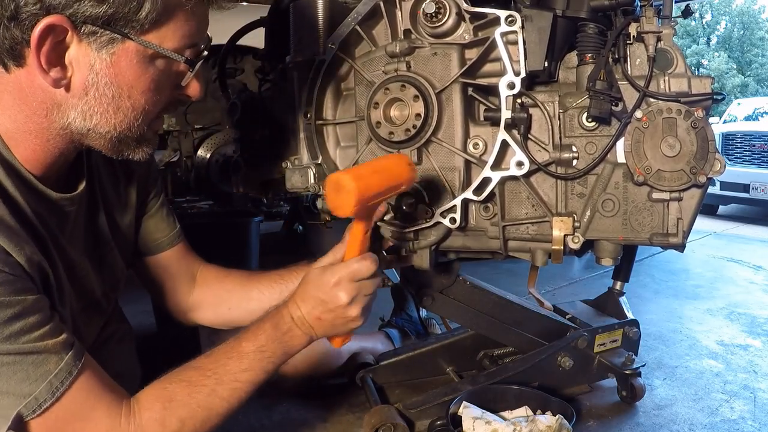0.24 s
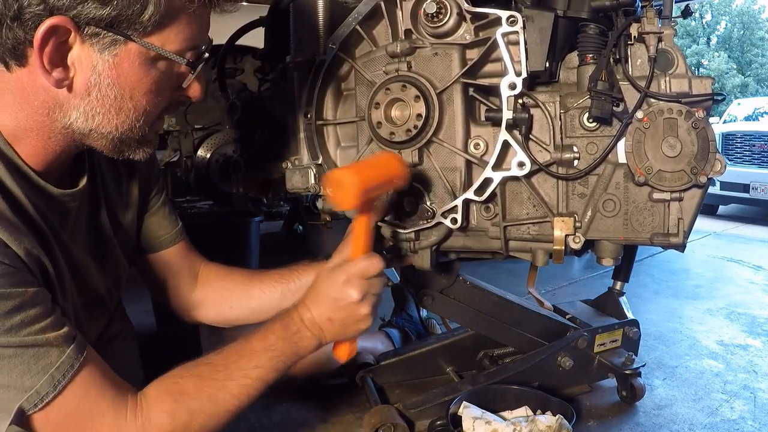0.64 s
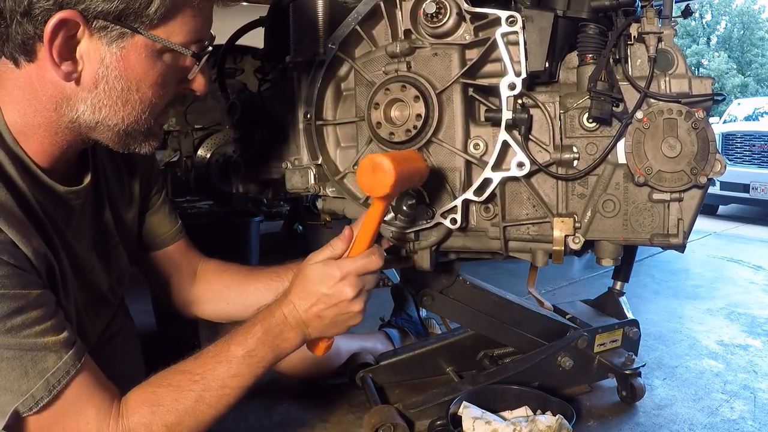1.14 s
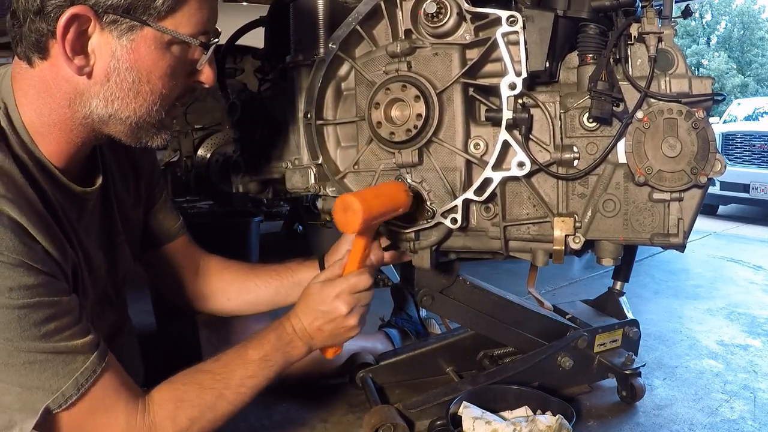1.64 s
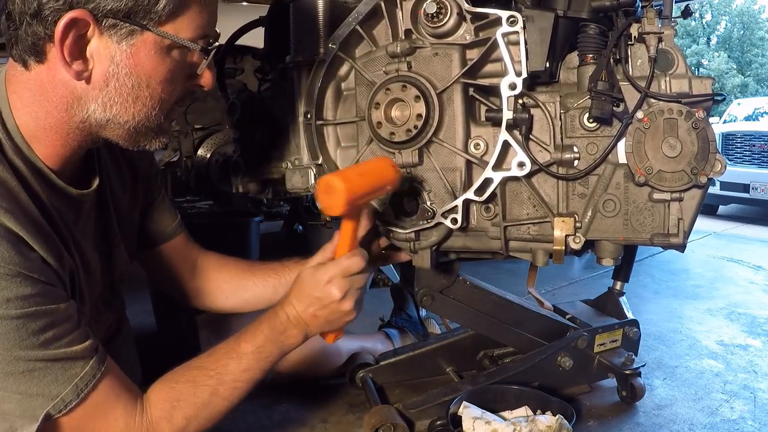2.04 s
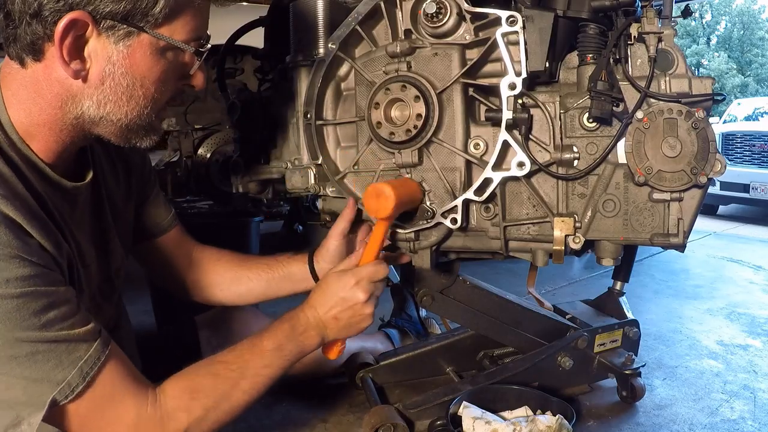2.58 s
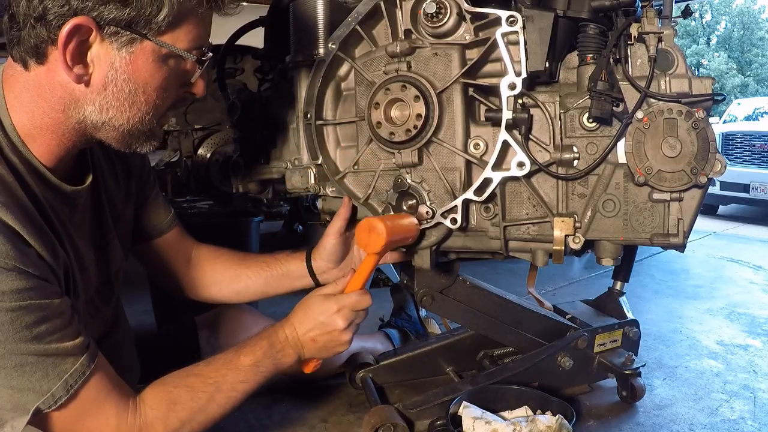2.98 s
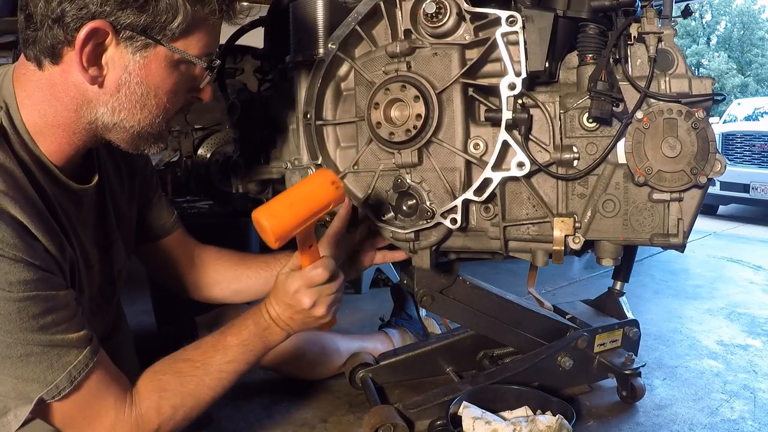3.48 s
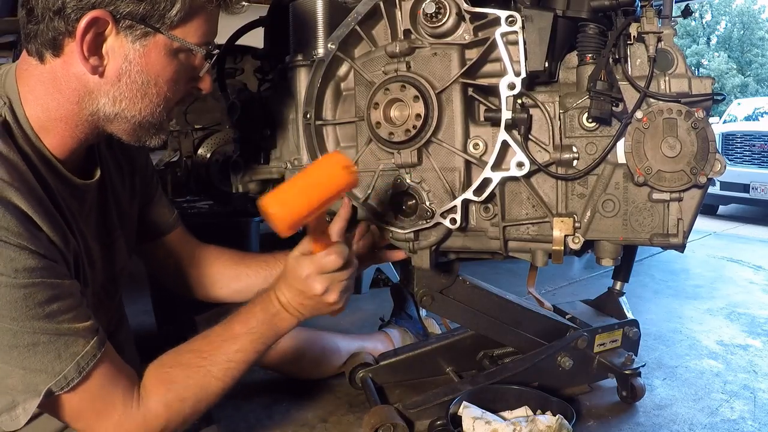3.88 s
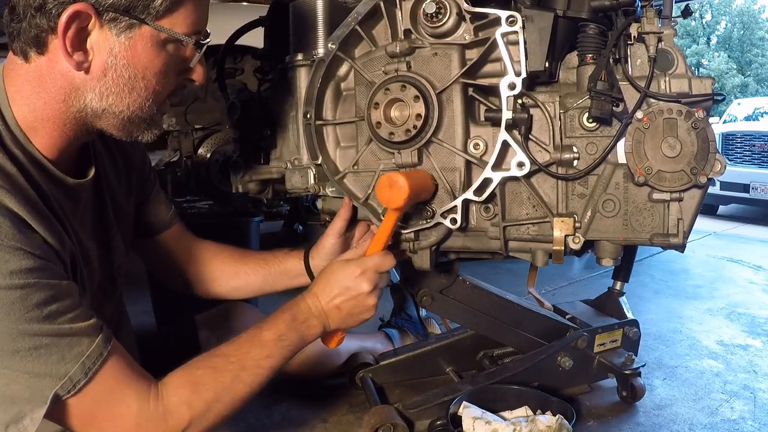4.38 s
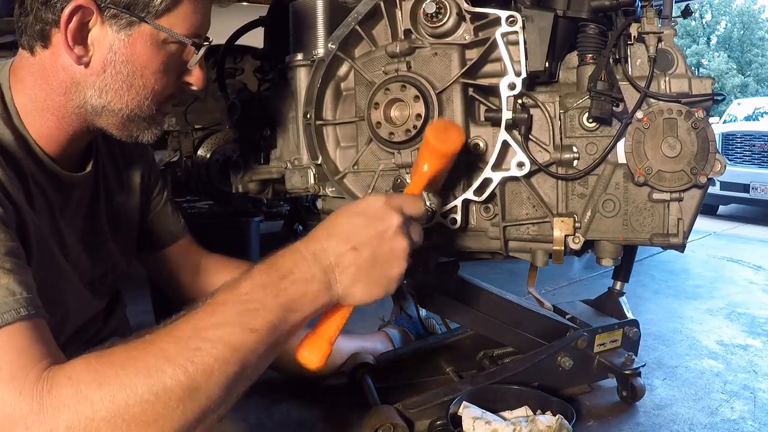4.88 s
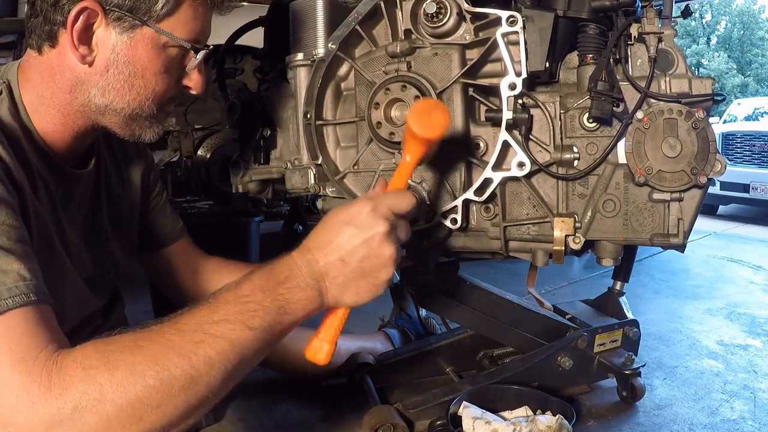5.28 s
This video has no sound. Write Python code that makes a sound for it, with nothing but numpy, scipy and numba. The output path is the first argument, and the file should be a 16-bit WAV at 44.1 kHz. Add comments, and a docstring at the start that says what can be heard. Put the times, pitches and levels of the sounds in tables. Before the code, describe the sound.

Steady sharp mallet knocks on a metal engine case, loose shot swishing between them, with a short garage echo and faint outdoor rumble.

```python
"""Mallet taps on a metal cover

A dead-blow mallet taps a cast metal cover home in front of a stereo camera in an open garage.
Each blow is a sum of short fading tones with a sharp snap; noise clicks make the loose steel shot
swish on the swing and slam after the blow. Loose parts clatter and case panels hum on in noise bands.
The garage answers with a short noise tail, over outdoor rumble and hiss; the camera holds the peaks down.
"""
import sys
import numpy as np
from scipy import signal
from scipy.fft import rfft, irfft, next_fast_len
from scipy.io import wavfile
from scipy.ndimage import uniform_filter1d
from numba import njit

SR = 44100
rng = np.random.default_rng(int(sys.argv[2]) if len(sys.argv) > 2 else 0)


def to_wav(s):
    """Save 16-bit WAV."""
    ch = np.atleast_2d(s).T  # columns
    pcm = np.round(np.clip(ch, -1, 1) * 32767)  # PCM
    wavfile.write(sys.argv[1], SR, pcm.astype(np.int16))


N = 243758
FAST = next_fast_len(N)  # padded length for quick transforms
SQUASH_S = 0.0008  # the soft face gives before the casting speaks

# The mallet blows; levels are relative. Three regions of pitch are favoured by the struck spot.
# Columns: start_s, blow_db, thud_db (of the head), low_hz, low_lift_db, high_hz, high_lift_db,
# bright_db (of the echo), slam_db (of the shot), bass_hz, bass_lift_db, snap_db, clatter_db
BLOWS = [(0.0307, -10, -34, 748, 6, 3300, 2, 0, -27, 520, 5, -12, -60),
         (0.3489, -9.5, -34, 759, 5, 6400, 6, 1, -26.5, 527, 6, -13, -54),
         (0.689, -17, -36, 2000, 2, 6700, 3, 1, -24.5, 199, 5, -22, -54),
         (1.488, -14, -31, 2380, 6, 5900, 6, 0, -26, 320, 2, -11, -56),
         (1.8229, -7.5, -36, 764, 4, 1695, 5, 1, -29.5, 190, 5, -5, -42),
         (2.2049, -7.5, -34, 1765, 6, 3280, 6, -1, -28, 400, 5, -11, -41),
         (2.5295, -7, -34, 1170, 3, 3150, 9, 3, -26.5, 430, 3, -5, -38),
         (2.9033, -11.5, -33, 974, 10, 2430, 4, -1, -27, 452, 1, -7, -50),
         (3.2251, -8, -36, 737, 2, 2240, 5, 4, -29, 300, 1, -6, -39),
         (3.573, -7, -36, 1550, 2, 2340, 7, 1, -27.5, 511, 3, -6, -40),
         (3.9516, -7, -34, 1000, 8, 3590, 3, 3, -25.5, 400, 7, -3, -39),
         (4.3086, -8.5, -32, 850, 3, 3270, 4, 0, -24.5, 400, 7, -9, -43),
         (5.0777, -27, -37, 4740, 4, 5900, 10, 0, -27, 247, 2, -23, -60),
         (5.4243, -11, -31, 904, 8, 3500, 4, -2, -26, 300, 3, -15, -56)]


def undb(db):
    """Turn decibels into a plain factor on the sound wave."""
    return 10 ** (np.asarray(db) / 20)


def along(table, hz):
    """Table value at hz, straight on a log-frequency axis."""
    points = np.array(table)
    return np.interp(np.log(np.maximum(hz, 1)), np.log(points[:, 0]), points[:, 1])


def colour(x, table):
    """Shape the spectrum; unit noise keeps rms 1."""
    gain = undb(along(table, np.fft.rfftfreq(FAST, 1 / SR)))
    gain = gain / np.sqrt(np.mean(gain ** 2))
    return irfft(rfft(x, FAST) * gain, FAST)[..., :N]


def spread(mid, side, focus):
    """Left and right from two unrelated sounds; focus 0 = diffuse, 1 = one point."""
    # Diffuse sound, how alike left and right are. Columns: pitch_hz, likeness (-1..1)
    likeness = [(60, 0.6), (130, 0.094), (290, 0.76), (640, -0.18), (1410, -0.29), (3100, 0.81),
                (6820, -0.06), (15000, -0.4)]
    size = next_fast_len(len(mid))
    alike = along(likeness, np.fft.rfftfreq(size, 1 / SR)) * (1 - focus) + focus
    alike = np.clip(alike, -1, 1)
    shared = rfft(mid, size) * np.sqrt((1 + alike) / 2)
    opposed = rfft(side, size) * np.sqrt((1 - alike) / 2)
    return irfft(np.array([shared + opposed, shared - opposed]), size)[:, :len(mid)]


def walk(rate):
    """Random levels held 1 / rate s and smoothed twice."""
    hold = int(SR / rate)
    steps = np.repeat(rng.standard_normal(N // hold + 1), hold)
    return uniform_filter1d(uniform_filter1d(steps, hold), hold)[:N]


@njit
def follow(x, attack, release):
    """Envelope that rises and sinks at two separate speeds (share of the gap closed per sample)."""
    level, out = 0., np.empty(len(x))
    for i in range(len(x)):
        level += (x[i] - level) * (attack if x[i] > level else release)
        out[i] = level
    return out


def lift_db(row, hz, width_octaves=0.3):
    """The struck spot favours three regions of pitch, each a smooth hump."""
    total = 0
    for centre_hz, hump_db in (row[9:11], row[3:5], row[5:7]):
        octaves = np.log2(np.maximum(hz, 1) / centre_hz)
        total = total + hump_db * np.exp(-(octaves / width_octaves) ** 2 / 2)
    return total


def blows(scatter_db=1.65, lag_rad=1.29, crack_s=0.00153):
    """Each blow rings fading tones, out of step at the two ports, and sends the walls a pitchless crack.

    Rows 0 and 1 are left and right; row 2 is what the walls hear from all faces of the casting at once.
    """
    # Mallet face and rim of the cover. Columns: pitch_hz, level_db (against the blow), t60_s
    face_modes = [(4000, -13, .008), (4520, -15, 0.013), (5250, -23, 0.013), (6210, -15, 0.014),
                  (6960, -10.5, 0.0063), (9700, -19, 0.006), (12100, -36, 0.0039), (14000, -34, 0.0057)]
    # Cover and case. Columns: pitch_hz, t60_s
    body_modes = [(200, .019), (330, .026), (510, .035), (640, .03), (765, .03), (860, .025), (960, .025),
                  (1130, .022), (1330, .015), (1560, .0115), (1760, .0115), (2010, .01), (2290, .009),
                  (2700, .0085), (3150, .0085), (3550, .0085)]
    # How strongly each blow wakes the body modes: one row per blow, one column of level_db per mode
    body_wake = [(-20, -30, -21, -34, -20, -23, -22, -22, -21, -19, -17, -16, -21, -30, -17, -20),
                 (-19, -35, -19, -37, -18, -20, -22, -22, -22, -15, -21, -21, -17, -18, -16, -15),
                 (-23, -29, -31, -32, -35, -31, -32, -41, -31, -24, -26, -21, -24, -30, -25, -25),
                 (-20, -22, -36, -31, -24, -27, -26, -31, -35, -26, -21, -16, -14, -25, -33, -17),
                 (-21, -42, -24, -36, -17, -19, -20, -20, -17, -15, -10, -12, -12, -21, -20, -16),
                 (-22, -23, -25, -28, -31, -23, -27, -17, -31, -21, -10, -17, -11, -18, -12, -11),
                 (-23, -23, -27, -28, -35, -20, -20, -14, -15, -19, -12, -13, -10, -10, -6, -8),
                 (-21, -27, -26, -25, -28, -22, -15, -16, -19, -28, -29, -16, -13, -18, -18, -17),
                 (-24, -26, -25, -25, -22, -24, -25, -19, -26, -18, -12, -11, -7, -17, -9, -12),
                 (-22, -29, -23, -23, -23, -22, -24, -21, -35, -13, -10, -8, -6, -19, -11, -10),
                 (-20, -20, -21, -26, -25, -16, -17, -11, -13, -20, -18, -20, -17, -15, -17, -12),
                 (-20, -20, -22, -22, -25, -20, -21, -19, -29, -20, -19, -15, -14, -24, -12, -13),
                 (-26, -31, -44, -43, -36, -39, -41, -36, -44, -31, -43, -33, -27, -42, -41, -27),
                 (-21, -22, -23, -35, -21, -21, -19, -20, -18, -21, -21, -18, -17, -17, -14, -14)]
    # How alike the two ports hear a blow. Columns: pitch_hz, likeness (-1..1)
    blow_likeness = [(60, 0.59), (130, 0.98), (290, 0.94), (640, 0.25), (1410, 0.54), (3100, 0.76),
                     (6820, 0.23), (15000, 0.44)]
    # Where the echo's brightness acts. Columns: pitch_hz, share (0..1)
    bright_zone = [(900, 0), (2600, 1), (6000, 1), (11000, 0)]
    # Share of the blow sent to the walls: level_db in each zone, and the zone centres (pitch_hz)
    wall_share_db, zone_hz = [-5.5, -14, -10.5, -17], [350, 1050, 2700, 6500]
    # Share of the shot slam sent to the walls. Columns: pitch_hz, level_db
    wall_slam = [(3000, -20), (6500, 5)]
    wall_thud = 0.5  # how far the echo's bass follows the thud rather than the blow
    wall_lift = 0.6  # how much of the spot's lift the walls hear
    detune = 0.012  # random share by which each mode's pitch varies from blow to blow
    build_s, build_cycles = 0.0004, 0.2  # a mode speaks after a moment; the low ones come later

    length = 8192
    out, t = np.zeros((3, N + length)), np.arange(length) / SR
    bins = np.fft.rfftfreq(length, 1 / SR)
    face_hz, face_db, face_t60 = np.transpose(face_modes)
    body_hz, body_t60 = np.transpose(body_modes)
    hz = np.r_[body_hz, face_hz][:, None]
    t60 = np.r_[body_t60, face_t60][:, None]
    build = 1 - np.exp(-t / (build_s + build_cycles / hz))
    # the less alike a band is at the two ports, the more its modes are out of step
    apart = lag_rad * np.sqrt(1 - np.clip(along(blow_likeness, hz), -1, 1))
    chance = rng.standard_normal((len(BLOWS), 4, len(hz), 1))

    bursts = rng.standard_normal((len(BLOWS), length)) * np.exp(-t / crack_s)
    cracks = rfft(np.roll(bursts, 400, axis=1))  # 400 samples (about 9 ms) late: some 3 m more path to a wall and back
    cracks = cracks / np.abs(cracks)  # keep the timing only; the level comes below

    for row, wake_db, (tune, size, phase, turn), crack in zip(BLOWS, body_wake, chance, cracks):
        blow_db, thud_db, bright_db, slam_db = row[1], row[2], row[7], row[8]
        first = int((row[0] + SQUASH_S) * SR)
        span = slice(first, first + length)

        rim_db = blow_db + face_db + lift_db(row, face_hz) + scatter_db * size[len(body_modes):, 0]
        mode_db = np.r_[wake_db, rim_db][:, None]
        fade = undb(mode_db - 60 * t / t60) * build
        start = np.pi + np.clip(hz / 1800, 0, 1) * phase  # the bass starts with a pull
        start[0] = 0  # the lowest mode swings the other way
        for ear in range(2):
            turns = 2 * np.pi * hz * (1 + detune * tune) * t + start + (ear - .5) * apart * turn
            out[ear, span] += np.sum(fade * np.sin(turns), axis=0)

        bass_db = wall_share_db[0] + wall_thud * (thud_db - blow_db)
        walls = list(zip(zone_hz, [bass_db, *wall_share_db[1:]]))
        casting_db = blow_db + bright_db * along(bright_zone, bins) + along(walls, bins)
        casting = undb(casting_db + wall_lift * lift_db(row, bins))
        slam = undb(slam_db + along(wall_slam, bins))
        out[2, span] += irfft(crack * np.hypot(casting, slam))
    return out[:, :N]


def snap(width_s=0.00007, give_s=0.0006, give_db=-14):
    """The face slaps the metal: a slow push of air, then one sharp pull."""
    out, t = np.zeros(N + 512), np.arange(512) / SR
    push = undb(give_db) * np.exp(-((t - SQUASH_S) / give_s) ** 2)
    pull = np.exp(-((t - SQUASH_S - 2 * width_s) / width_s) ** 2)
    for row in BLOWS:
        first, snap_db = int(row[0] * SR), row[11]
        out[first:first + 512] += undb(snap_db) * (push - pull)
    return out[:N]


def pellets(size, table, focus, grain_db):
    """Dense clicks of uneven size, coloured by the table and following the loudness in size."""
    uneven = undb(grain_db * np.minimum(rng.exponential(size=(2, N)), 6))
    clicks = rng.standard_normal((2, N)) * uneven
    return spread(*colour(clicks / np.std(clicks) * size, table), focus)


def shot(roll_sizzle_db=-23, slam_sizzle_db=-17):
    """The shot rolls on each swing, then flies on and piles on the face some ms after the blow."""
    # Shot rolling in the head. Columns: peak_s, level_db, swell_s, fall_s,
    # ring_hz (of the hollow head), ring_db
    swings = [(0.004, -42, .05, .02, 5800, -8), (0.309, -34, .055, .007, 5900, -6),
              (0.649, -32.5, .06, .007, 3800, -6), (0.991, -39, .04, .012, 5400, 0),
              (1.175, -47.5, .06, .04, 6500, -6), (1.379, -43, .06, .015, 5000, -7),
              (1.772, -34.5, .058, .012, 5300, -7), (2.16, -32.5, .066, .007, 6200, -6),
              (2.48, -34, .062, .008, 6000, -7), (2.816, -39, .045, .02, 5300, -5),
              (3.179, -34.5, .05, .011, 5100, -6), (3.529, -32.5, .062, .006, 3700, -7),
              (3.904, -32, .078, .007, 5900, -7), (4.228, -40, .005, .015, 5000, -8),
              (4.261, -30.5, .045, .01, 5000, -8), (4.825, -51, .06, .05, 5900, -5),
              (5.04, -37.5, .04, .013, 6800, -6), (5.381, -35, .034, .011, 6400, -5)]
    # Tone of the rolling shot. Columns: pitch_hz, level_db (per Hz)
    roll_tone = [(1000, -34), (1700, -12), (2400, -5.5), (3600, -4), (5600, 0), (7200, -3), (8400, -16),
                 (9700, -12), (10800, -21), (13800, -22), (15200, -32)]
    # Tone of the shot piling on the face. Columns: pitch_hz, level_db (per Hz)
    slam_tone = [(900, -26), (1500, -13), (2500, -6), (3600, -6), (4600, -7), (5900, 0), (7200, -4),
                 (8500, -14), (12000, -26)]
    # Tone of pellet on pellet. Columns: pitch_hz, level_db (per Hz)
    sizzle_tone = [(7000, -30), (9500, -2), (12000, 2), (14800, 0), (15500, -18)]
    swell_power = 1.4  # bend of the swell
    settle_db, settle_s = -13, 0.04  # stray pellets that roll on
    roll_level_db = -2.2  # overall level of the rolling shot
    hollow_hz = 500  # width of the ring of the hollow head
    late_base_s, late_s_per_db = 0.004, 0.0002  # the softer the blow, the later the shot lands
    landing_spread = 0.7  # width of the landing as a share of its delay

    t = np.arange(N) / SR
    stir, slam, sizzle, hollow = 0, 0, 0, 0
    clumps = undb(2.0 * walk(250))  # the shot moves in clumps
    noise = rng.standard_normal(N)
    stray = undb(settle_db)
    for peak_s, level_db, swell_s, fall_s, ring_hz, ring_db in swings:
        since = np.maximum(t - peak_s, 0)
        swell = np.clip(1 + (t - peak_s) / swell_s, 0, 1) ** swell_power
        fall = (1 - stray) * np.exp(-since / fall_s) + stray * np.exp(-since / settle_s)
        roll = clumps * undb(level_db + roll_level_db) * swell * fall
        stir = stir + roll
        ring = signal.lfilter(*signal.iirpeak(ring_hz, ring_hz / hollow_hz, fs=SR), noise * roll)
        # the root makes up for the level lost in the narrow band
        hollow = hollow + undb(ring_db) * ring * np.sqrt(SR / np.pi / hollow_hz)

    for row in BLOWS:
        start_s, blow_db, slam_db = row[0], row[1], row[8]
        late_s = late_base_s - late_s_per_db * blow_db
        after = (t - start_s - late_s) / (landing_spread * late_s)
        stretch = np.where(after > 0, 1.8, 1)  # it thins out more slowly than it gathers
        arrive = np.exp(-(after / stretch) ** 2 / 2) * (t > start_s + SQUASH_S)
        slam = slam + undb(slam_db) * arrive
        # the sizzle is the densest moment
        sizzle = sizzle + undb(slam_db + slam_sizzle_db) * arrive ** 2
    sizzle = sizzle + undb(roll_sizzle_db) * stir

    rolling = pellets(stir, roll_tone, 0.41, 2.8)
    slamming = pellets(slam, slam_tone, 0.7, 1.64)
    sizzling = pellets(sizzle, sizzle_tone, 0.5, 3.2)
    return hollow + rolling + slamming + sizzling


def clatter(densest_s=0.08):
    """Loose parts on the engine case shake on for a moment after a blow, as a burst of dense clicks."""
    # Tone of the loose parts. Columns: pitch_hz, level_db (per Hz)
    clatter_tone = [(200, -20), (380, 0), (600, -2), (800, -1), (1050, 1), (1350, -13), (1700, -8),
                    (2000, -9), (2800, -5), (3500, -11), (4400, -8), (6300, -8), (8000, -34)]
    t, shake = np.arange(N) / SR, 0
    for row in BLOWS:
        start_s, clatter_db = row[0], row[12]
        since = np.maximum(t - start_s, 0) / densest_s
        shake = shake + undb(clatter_db) * since ** 2 * np.exp(1 - since ** 2)
    uneven = undb(2.5 * walk(60.0))
    return pellets(shake * uneven, clatter_tone, 0.3, 3.5)


def panels(focus=0.3, build_s=0.015):
    """Each panel of the case, shaken unevenly, hums in its own narrow band and dies away."""
    # Panels that buzz on after a blow. Columns: pitch_hz, width_hz, t60_s
    panel_bands = [(368, 40, .5), (805, 40, .5), (1030, 70, .45), (1555, 50, .4), (1770, 60, .4)]
    # How strongly each blow sets them buzzing: one row per blow, one column of level_db per panel
    panel_buzz = [(-47, -48, -54, -53, -56), (-49, -46, -48, -51, -52), (-44, -56, -54, -58, -54),
                  (-43, -55, -54, -60, -60), (-48, -36, -42, -48, -47), (-37, -47, -38, -50, -39),
                  (-36, -46, -35, -49, -41), (-44, -43, -42, -55, -58), (-47, -33, -50, -38, -47),
                  (-37, -33, -46, -49, -47), (-34, -42, -32, -47, -41), (-33, -49, -35, -51, -42),
                  (-50, -58, -58, -60, -60), (-48, -44, -45, -55, -54)]
    kicks, out = np.zeros((len(panel_bands), N)), 0
    starts = (np.array([row[0] for row in BLOWS]) * SR).astype(int)
    kicks[:, starts] = undb(np.transpose(panel_buzz))
    for (hz, width_hz, t60), kick in zip(panel_bands, kicks):
        keep_slow = undb(-60 / t60 / SR)  # share of the level left after one sample
        keep_fast = keep_slow * np.exp(-1 / build_s / SR)
        # slow fade minus quick fade: builds up, then dies away
        shake = signal.lfilter([1], [1, -keep_slow], kick) - signal.lfilter([1], [1, -keep_fast], kick)
        noise = rng.standard_normal((2, N))
        hum = signal.lfilter(*signal.iirpeak(hz, hz / width_hz, fs=SR), noise)
        out = out + hum * shake * np.sqrt(SR / np.pi / width_hz)
    return spread(*out, focus)


def garage(x, first_s=0.0027, fill_s=0.013, wet_db=-22):
    """Diffuse echoes that fill up after the first walls and die band by band."""
    # Echo bands. Columns: pitch_hz, t60_s, level_db
    echo_bands = [(165, 0.26, 15.5), (255, .3, 10), (365, 0.37, 14.5), (706, 0.35, 9.5), (1020, 0.53, 5.5),
                  (1670, 0.44, -0.5), (2910, 0.41, -4.5), (4300, 0.34, -9), (6400, 0.38, -4),
                  (8800, 0.17, -13.5), (13000, 0.22, -32)]
    t = np.arange(SR // 2) / SR
    tail = 0
    for hz, t60, level_db in echo_bands:
        band = signal.butter(2, [hz / 1.3, hz * 1.3], "band", fs=SR, output="sos")
        noise = signal.sosfilt(band, rng.standard_normal((2, len(t))))
        tail = tail + noise * undb(level_db - 60 * t / t60)
    fill = (1 - np.exp(-t / first_s)) * (1 - 0.2 * np.exp(-t / fill_s))
    tail = spread(*tail, 0) * fill
    return undb(wet_db) * signal.fftconvolve(x[None], tail, axes=1)[:, :N]


def outdoors(level_db=-45, swell_db=2.0):
    """Far traffic and leaves through the open door: coloured noise that slowly swells and sinks."""
    # Tone of the outdoors. Columns: pitch_hz, level_db (per Hz)
    outdoor_tone = [(76, -30), (135, 0), (300, -6.5), (358, -2), (400, -9.5), (550, -12), (1100, -11.5),
                    (1300, -15), (1600, -10.5), (2000, -18), (2400, -22), (5200, -25.5), (7300, -20.5),
                    (14200, -44), (16000, -59)]
    bed = spread(*colour(rng.standard_normal((2, N)), outdoor_tone), 0)
    return bed * undb(level_db + swell_db * walk(0.8))


def scene():
    """Mix the blows, the shot, the shaken case, the echo and the outdoors."""
    knocks, rattle = blows() * undb(6.5), shot()
    room = garage(undb(12.5) * knocks[2] + undb(-14) * rattle[0])
    return knocks[:2] + snap() + rattle + clatter() + panels() + room + outdoors()


def record(dry, top_db=-24, ratio=1.79, attack_s=0.019, release_s=0.037):
    """Uneven ports, gain control that leans on each blow, wind filter, soft clipping, top cut."""
    # How the two ports differ. Columns: pitch_hz, left_minus_right_db
    port_lean = [(60, -2), (110, 2), (200, 0), (380, 2.0), (700, 0), (1290, -1), (2380, 2.5), (4400, -1),
                 (8120, 2.5), (15000, -2.5)]
    # Low murmur added after the wind filter. Columns: pitch_hz, level_db (per Hz)
    murmur_tone = [(20, -9), (60, 5), (120, -3), (300, -26)]
    murmur_db = -80.5
    bass_cut_hz, leak = 156, 0.04  # wind filter, and the share that passes it
    top_hz = 16400

    lean_db = along(port_lean, np.fft.rfftfreq(FAST, 1 / SR))
    lean = undb(np.outer([.5, -.5], lean_db))
    x = irfft(rfft(dry, FAST) * lean, FAST)[:, :N]

    loud = follow(np.max(np.abs(x), axis=0), 1 / (attack_s * SR), 1 / (release_s * SR))
    over = np.minimum(1, undb(top_db) / (loud + 1e-9))  # below 1 only when too loud
    x = x * over ** (1 - 1 / max(ratio, 1))

    wind_filter = signal.butter(8, bass_cut_hz, "high", fs=SR, output="sos")
    x = signal.sosfilt(wind_filter, x) + leak * x
    murmur = spread(*colour(rng.standard_normal((2, N)), murmur_tone), 0)
    x = np.tanh(x + undb(murmur_db) * murmur)
    return signal.sosfilt(signal.ellip(10, .2, 80, top_hz, fs=SR, output="sos"), x)


dry = scene()
out = record(dry)
to_wav(out)
```